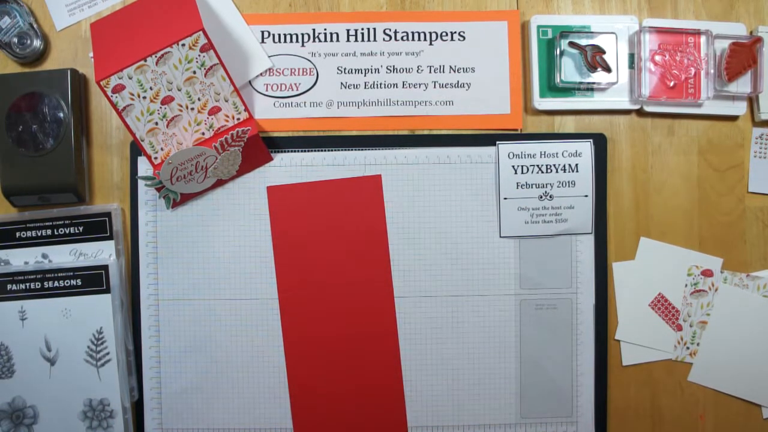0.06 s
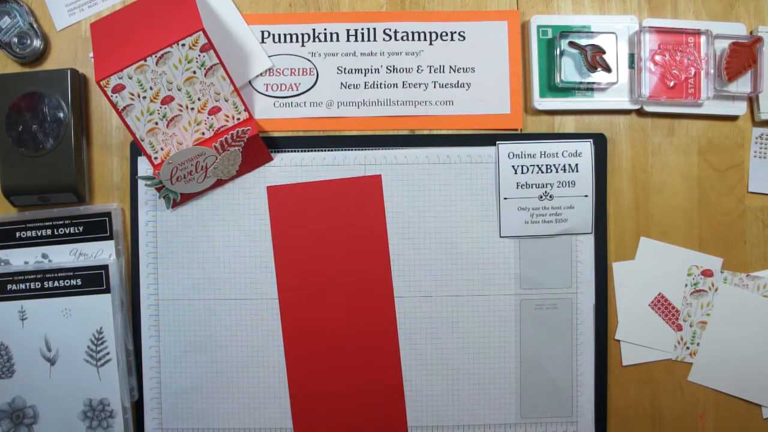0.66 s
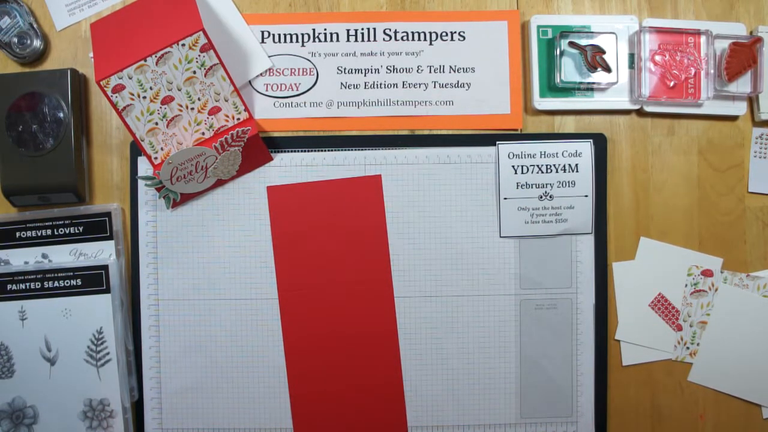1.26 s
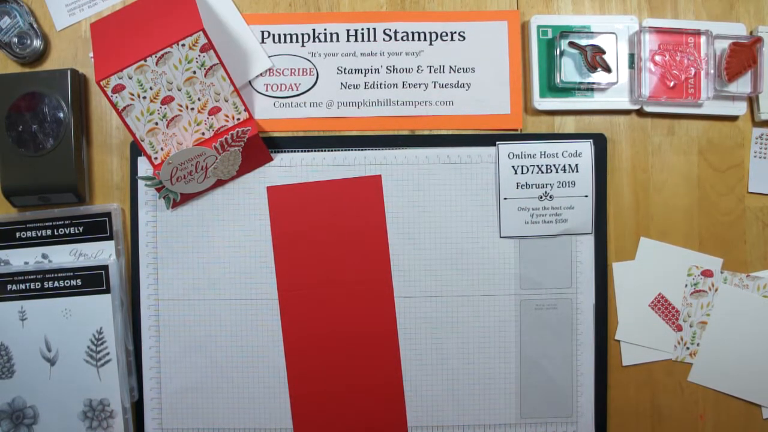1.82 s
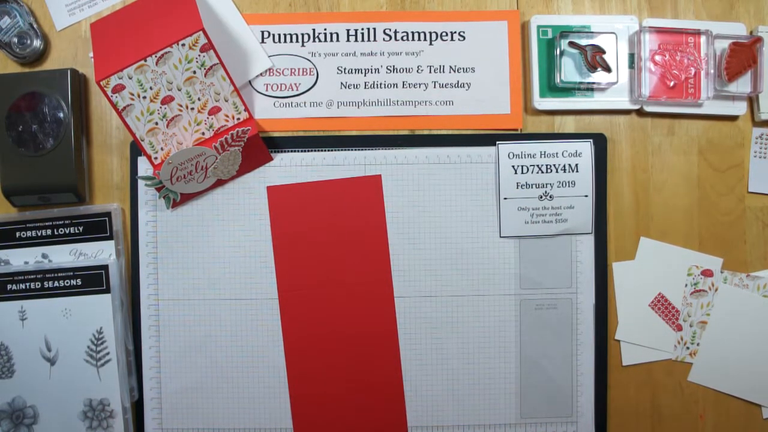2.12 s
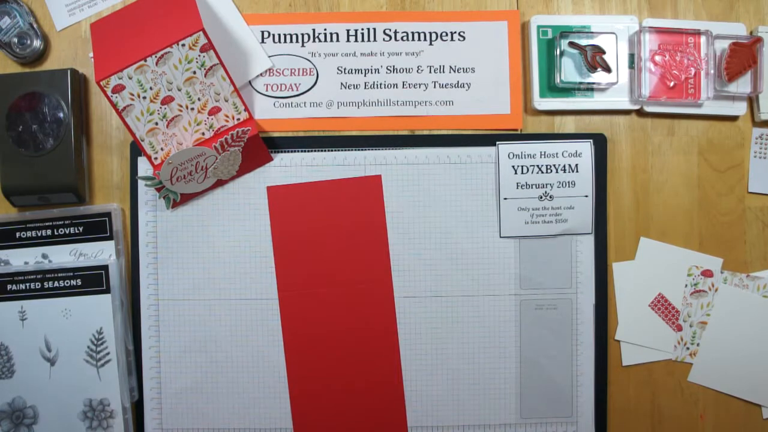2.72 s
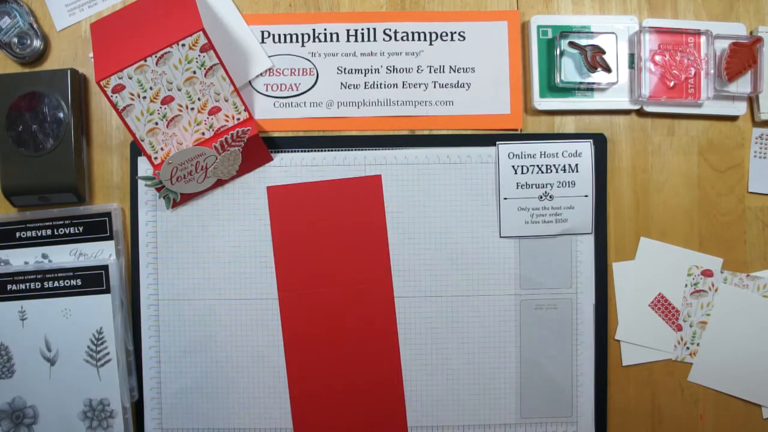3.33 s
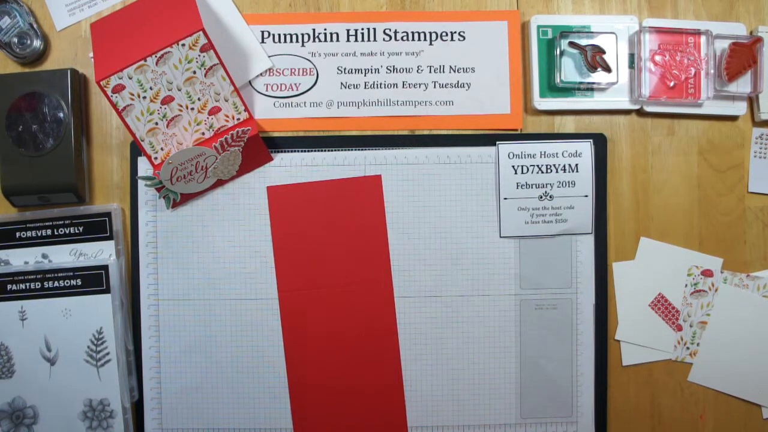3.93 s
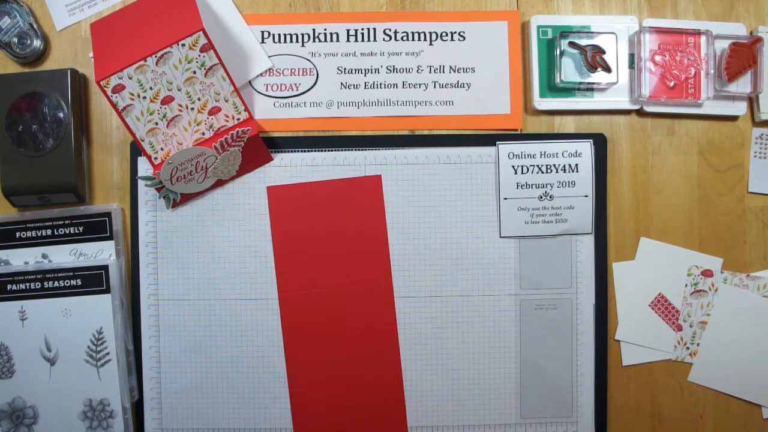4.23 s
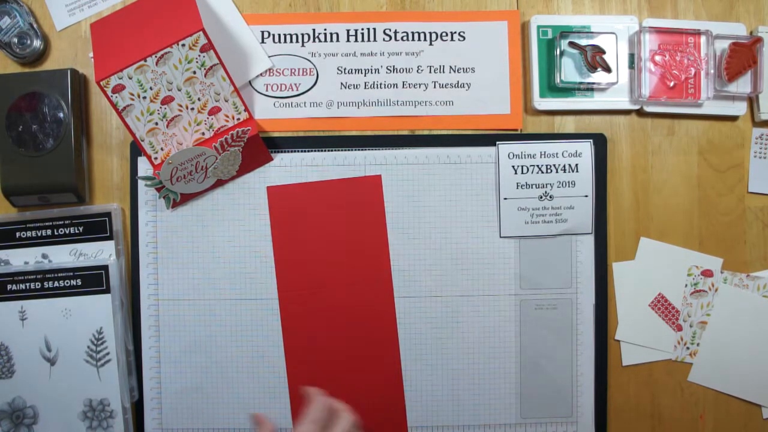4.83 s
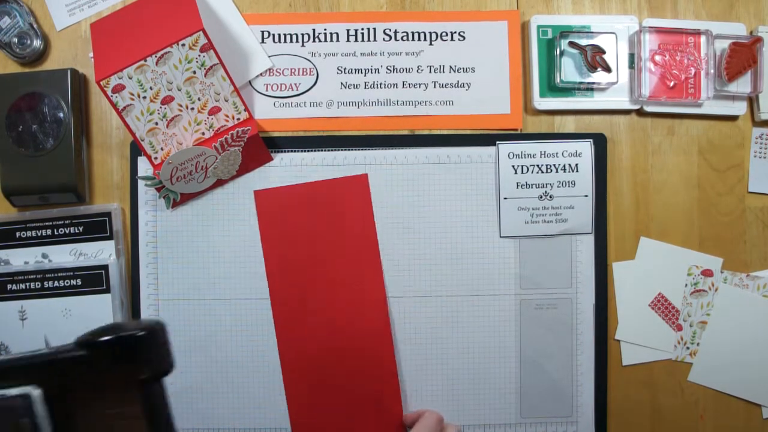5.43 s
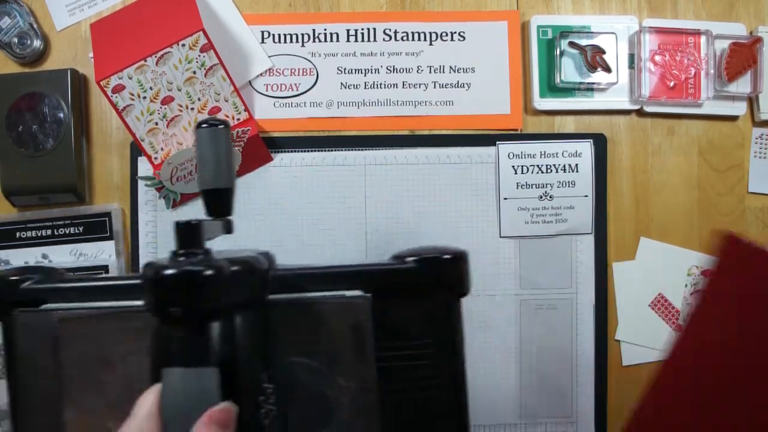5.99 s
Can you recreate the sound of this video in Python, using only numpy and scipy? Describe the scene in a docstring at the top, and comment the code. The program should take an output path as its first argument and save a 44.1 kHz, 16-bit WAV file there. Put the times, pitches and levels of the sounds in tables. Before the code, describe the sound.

Scrapes, loud knocks and plastic clatter as a heavy hand-cranked machine is shifted on a table, followed by lighter taps and rubs.

```python
"""Scrapes and bumps at the left: a heavy hand-cranked die-cutting machine is dragged and set down on a
wooden table in a small room. Its plastic plates clack and slide on the bed; then it is lifted over the
table, nearer the centre, while a card strip is pulled away. Blows ring damped modes and crack at the
edges; friction gives grainy noise, stick-slip gives brief tones. Two close microphones hear it from
above, over a steady hush."""
import sys
import numpy as np
from scipy import signal
from scipy.fft import rfft, irfft, next_fast_len
from scipy.io import wavfile
from scipy.ndimage import map_coordinates

SR = 44100
rng = np.random.default_rng(int(sys.argv[2]) if len(sys.argv) > 2 else 0)


def file_out(sig):
    """Save sig as 16-bit WAV at sys.argv[1]."""
    # one column per channel
    cols = np.atleast_2d(sig).T
    # limit, then scale
    lim = np.clip(cols, -1, 1)
    pcm = np.round(lim * 32767).astype(np.int16)
    wavfile.write(sys.argv[1], SR, pcm)


N = 267157


def machine_bumps():
    """The base hits the table; machine and table ring together."""
    # t/s, level/dB, body f/Hz, contact hardness/dB, hand damping/(dB/s)
    hits = [(0.333, -16, 420, -40, 32), (0.707, -23, 470, -42, 50), (0.926, -28, 384, -14.5, 10),
            (1.405, -5, 503, -23.5, 85), (1.853, -9, 517, -29, 58), (1.862, -5, 490, -19, 25),
            (1.882, -14, 494, -10.5, 13), (3.256, -34, 490, -33, 40), (3.319, -29, 546, -22, 40),
            (3.451, -18.5, 487, -21.5, 52), (3.483, -26, 404, -14, 94), (4.744, -38, 296, -13.5, 35),
            (4.855, -36.5, 353, -30, 38), (5.584, -36, 300, -26, 50), (5.939, -31, 648, -13.5, 38)]
    # machine on table: f/Hz, level/dB, t60/s
    modes = [(110.2, -5.5, 0.53), (228.4, -2.5, 0.146), (279.5, -2, 0.46), (439, 0, 0.24), (547, -2, 0.17),
             (615, 0, 0.33), (720, -0.5, 0.12), (903, -2, 0.29), (991, 4.5, 0.18), (1177, 5.5, 0.16),
             (1323, 6, 0.27), (1463, 3.5, 0.25), (2040, 2, 0.21), (2520, -17, 0.22)]
    return blows(hits, modes, push_db=15.5, chatter_t60_s=0.12, chatter_db=7.5, room_db=13, ring_db=-0.5,
                 body_db=-17, crack_db=-1.5, tick_db=-10.5, tick_growth=1.15, band_ratio=1.51)


def plate_clacks():
    """Plastic plates clack and rattle on the bed."""
    # t/s, level/dB, body f/Hz, contact hardness/dB, hand damping/(dB/s)
    hits = [(0.349, -19.5, 940, -36, 39), (0.924, -23.5, 800, -7.5, 8), (1.652, -33.5, 590, 0, 30),
            (1.915, -20, 920, -22, 22), (2.563, -5.5, 860, -14.5, 9), (2.679, -29, 670, -15, 10),
            (2.994, -32.5, 690, -6, 3), (3.035, -35, 720, -22, 30), (3.353, -18, 735, -24, 42),
            (3.408, -20, 1060, -28, 47), (3.563, -35.5, 980, -9, 30), (4.741, -36, 1290, -13, 30),
            (4.906, -38.5, 810, -28, 15), (5.032, -41, 830, -6.5, 25), (5.358, -38.5, 850, -11, 10),
            (5.778, -36, 1090, -7, 27)]
    # plates: f/Hz, level/dB, t60/s
    modes = [(184.8, 2, 0.33), (503, 6.5, 0.42), (519, 1, 0.56), (600, -9, 0.31), (729, 3, 0.53),
             (806, 1.5, 0.29), (978, 10, 0.2), (1030, 10.5, 0.22), (1140, 1.5, 0.25), (1218, 9, 0.18),
             (1380, -10, .24), (2000, -28, .27), (2264, 7, 0.32), (2364, 2, 0.3), (2820, 1, 0.43),
             (3080, 8, 0.17), (3198, -16, 0.11), (3630, -15, 0.22)]
    return blows(hits, modes, push_db=-2.5, chatter_t60_s=0.076, chatter_db=3.5, room_db=8, ring_db=-1.5,
                 body_db=-12.5, crack_db=-4.5, tick_db=-5, tick_growth=1.93, band_ratio=1.62)


def blows(hits, modes, push_db, chatter_t60_s, chatter_db, room_db, ring_db,
          body_db, crack_db, tick_db, tick_growth, band_ratio):
    """Each blow knocks the body and rings its modes; harder contact cracks and ticks more."""
    out = np.zeros((2, N))
    for start_s, level_db, body_hz, hardness_db, damping_db_per_s in hits:
        knock = contact(start_s, push_db, chatter_t60_s, chatter_db, room_db)
        t = np.arange(knock.shape[1]) / SR
        # place of contact sets body pitch and favoured modes
        lo_hz, hi_hz = body_hz / band_ratio, body_hz * band_ratio
        body = onset_unit(band(knock, lo_hz, hi_hz, order=3))
        ring = band(ringing(modes, t), lo_hz, hi_hz, order=1)
        ring = onset_unit(placed(ring, start_s))
        sound = amp(body_db) * (body + amp(ring_db) * ring)
        sound += amp(crack_db + hardness_db) * edge_crack(start_s, lo_hz=1670, hi_hz=3740)
        sound += amp(tick_db + tick_growth * hardness_db) * edge_crack(start_s, lo_hz=4030, hi_hz=11100)
        add(out, sound * amp(level_db - damping_db_per_s * t), start_s)
    return out


def ringing(modes, t):
    """Damped sines; the higher ones differ more in phase between microphones."""
    ring = np.zeros((2, len(t)))
    for hz, level_db, t60_s in modes:
        envelope = amp(level_db + rng.normal(0, 1)) * 1000 ** (-t / t60_s)
        phase_rad = rng.normal(0, min(hz / 1200, 1), (2, 1))
        ring += envelope * np.sin(2 * np.pi * hz * t + phase_rad)
    return ring * attack(len(t), rise_s=0.002)


def edge_crack(start_s, lo_hz, hi_hz):
    """A hard edge cracks; most of its treble arrives off the walls."""
    edge = contact(start_s, push_db=2, chatter_t60_s=0.34, chatter_db=2.5, room_db=9)
    edge *= attack(edge.shape[1], rise_s=0.0025)
    return onset_unit(band(edge, lo_hz, hi_hz, order=2))


def contact(start_s, push_db, chatter_t60_s, chatter_db, room_db):
    """Broadband excitation: sharp push, chatter of loose parts, room tail."""
    tail = room_tail()
    t = np.arange(tail.shape[1]) / SR
    chatter = rng.standard_normal(len(t)) * 1000 ** (-t / chatter_t60_s)
    push = signal.unit_impulse(len(t), SR // 1000)
    direct = amp(push_db) * push + amp(chatter_db) * chatter / np.linalg.norm(chatter)
    return placed(direct, start_s) + amp(room_db) * tail


def table_thuds():
    """Weight settles on the machine's feet; the table top thuds."""
    # t/s, level/dB
    thuds = [(1.343, -55.5), (1.875, -40), (2.564, -43), (3.28, -55), (3.481, -57), (4.744, -51.5),
             (5.94, -52)]
    out = np.zeros((2, N))
    for start_s, level_db in thuds:
        push = contact(start_s, push_db=-5.5, chatter_t60_s=0.095, chatter_db=8.5, room_db=6)
        add(out, amp(level_db) * onset_unit(band(push, lo_hz=98, hi_hz=221, order=2)), start_s)
    return out


def edge_flicks():
    """Thin edges of card and plate snap free: all treble, no body."""
    # t/s, level/dB
    flicks = [(0.576, -48.5), (1.652, -43.5), (5.128, -55.5), (5.147, -52), (5.922, -33)]
    out = np.zeros((2, N))
    for start_s, level_db in flicks:
        snap = contact(start_s, push_db=-2, chatter_t60_s=0.082, chatter_db=12.5, room_db=12.5)
        snap *= attack(snap.shape[1], rise_s=0.002)
        add(out, amp(level_db) * onset_unit(band(snap, lo_hz=3300, hi_hz=10200, order=1)), start_s)
    return out


def slides(rumble_db=-2.5, rasp_db=-1.5, hiss_db=-4.5):
    """Base, plates or card scrape along; a light, bright slide hisses more and rumbles less."""
    # t/s, length/s, level/dB, swell/dB, brightness/dB
    pushes = [(0.0, 0.05, -41.5, -16.5, 0), (0.098, 0.16, -46, 9.5, -2), (0.244, 0.064, -35, 10, 2.5),
              (0.45, 0.453, -48, -0.5, 0.5), (0.978, 0.14, -54.5, -24, -3), (1.147, 0.14, -50, -4, 0),
              (1.264, 0.21, -40, 3.5, 5), (1.435, 0.25, -42.5, 0, 1.5), (1.654, 0.22, -39, -9, 1),
              (2.029, 0.14, -54.5, 0.5, -0.5), (3.191, 0.184, -49, 16, -5.5),
              (3.358, 0.14, -38.5, -0.5, 0.5), (5.357, 0.093, -45, 3.5, 0), (5.523, 0.15, -48, -7, 4),
              (5.67, 0.066, -40.5, 8, 9), (5.747, 0.2, -54.5, 1, -2.5), (5.98, 0.072, -56, -12, -2.5)]
    # spectra excited by sliding: f/Hz, density/dB
    rumble = [(40, -22), (110, -15.5), (220, -6.5), (420, -2), (750, -2), (1200, -4), (1800, -5.5),
              (4000, -34)]
    rasp = [(700, -33), (1300, -1.5), (1700, -2.5), (3000, 2), (4200, -3.5), (7000, -18)]
    hiss = [(2500, -48), (4500, -4.5), (7000, -5), (11000, -10.5)]
    out = np.zeros((2, N))
    for start_s, length_s, level_db, swell_db, bright_db in pushes:
        envelope = amp(level_db) * stroke(length_s, swell_db)
        layers = ((rumble, rumble_db - bright_db), (rasp, rasp_db), (hiss, hiss_db + bright_db))
        scrape = sum(amp(db) * friction(spectrum, len(envelope)) for spectrum, db in layers)
        add(out, in_room(envelope * scrape, start_s, room_db=5.5), start_s)
    return out


def friction(spectrum, n, grain_db=3.5, judder_db=2):
    """Tiny uneven catches, bunched by the stroke's judder; rms 1."""
    catches = rng.standard_normal(n)
    catches *= amp(grain_db * wobble(n, rate_hz=700) + judder_db * wobble(n, rate_hz=43.8))
    return unit(filtered(catches, lambda hz: amp(along(spectrum, hz))))


def edge_rubs(grain_db=3):
    """An edge catches and scrapes in one resonance."""
    # t/s, length/s, centre f/Hz, half width/octaves, level/dB
    rubs = [(0.261, 0.09, 1180, 0.47, -39), (0.574, 0.033, 1510, 0.6, -44.5),
            (0.645, 0.015, 1820, 0.4, -37.5), (0.828, 0.035, 1580, 0.58, -43),
            (1.19, 0.058, 190, 0.48, -52), (1.727, 0.029, 486, 0.4, -35.5),
            (2.779, 0.028, 218, 0.39, -48.5), (5.135, 0.022, 4370, 0.46, -44.5),
            (5.185, 0.04, 4930, 0.26, -43), (5.534, 0.016, 3250, 0.34, -37.5),
            (5.616, 0.011, 2380, 0.61, -42), (5.676, 0.043, 1590, 0.52, -43),
            (5.815, 0.048, 408, 0.45, -54)]
    out = np.zeros((2, N))
    for start_s, length_s, centre_hz, half_width_oct, level_db in rubs:
        envelope = amp(level_db) * stroke(length_s)
        n = len(envelope)
        catches = rng.standard_normal(n) * amp(grain_db * wobble(n, rate_hz=598))
        scrape = filtered(catches, lambda hz: 1 / (1 + (np.log2((hz + 1) / centre_hz) / half_width_oct) ** 2))
        add(out, in_room(envelope * unit(scrape), start_s, room_db=4), start_s)
    return out


def squeaks():
    """Surfaces stick and slip at one nearly pure pitch."""
    # t/s, length/s, f/Hz, level/dB
    slips = [(0.263, 0.015, 1680, -33), (0.307, 0.011, 1480, -42), (0.563, 0.013, 755, -41),
             (1.747, 0.075, 770, -40), (3.573, 0.014, 763, -46)]
    out = np.zeros((2, N))
    for start_s, length_s, hz, level_db in slips:
        envelope = amp(level_db) * stroke(length_s)
        add(out, slip_tone(envelope, hz, start_s, waver=0.015, harmonic_step_db=-16), start_s)
    return out


def plate_zip(start_s=3.757, length_s=0.14, level_db=-50.5, start_hz=971, rise_hz_per_s=7500):
    """A plate ticks over a ridged surface at a rising rate."""
    out = np.zeros((2, N))
    envelope = amp(level_db) * stroke(length_s, swell_db=-9)
    t = np.arange(len(envelope)) / SR
    ridge_hz = start_hz + rise_hz_per_s * np.minimum(t, length_s)
    add(out, slip_tone(envelope, ridge_hz, start_s, waver=0.1, harmonic_step_db=-2.5), start_s)
    return out


def slip_tone(envelope, hz, start_s, waver, harmonic_step_db):
    """Unevenly spaced slips make a rough five-harmonic tone."""
    phase = 2 * np.pi * np.cumsum(hz * (1 + waver * wobble(len(envelope), rate_hz=700))) / SR
    tone = sum(amp(harmonic_step_db * k) * np.sin((k + 1) * phase) for k in range(5))
    return in_room(envelope * unit(tone), start_s, room_db=0.5)


def stroke(length_s, swell_db=0, grip_share=0.041, release_s=0.0097, tail_s=0.35):
    """Rubbing envelope: grip, even swell or fade, release."""
    t = np.arange(round((length_s + tail_s) * SR)) / SR
    swell = amp(swell_db * (np.minimum(t / length_s, 1) - 0.5))
    release = np.exp(-np.maximum(t - length_s, 0) / release_s)
    return attack(len(t), grip_share * length_s) * swell * release


def placed(x, start_s):
    """Sound reaches the nearer microphone first."""
    # t/s, left microphone lead/ms
    bearing = [(0, 0.18), (3.6, 0.16), (5, -0.035), (6, -0.0098)]
    lead_s = np.interp(start_s, *np.transpose(bearing)) / 1000
    return filtered(x, lambda hz: np.exp(1j * np.pi * lead_s * np.outer([1, -1], hz)))


def in_room(x, start_s, room_db):
    """Direct sound plus reverberation, at unchanged power."""
    wet = signal.fftconvolve(x[None], room_tail(), axes=1)[:, :len(x)]
    return (placed(x, start_s) + amp(room_db) * wet) / np.sqrt(1 + amp(room_db) ** 2)


def room_tail():
    """Fresh stereo reverberation of energy 1; treble dies first."""
    # f/Hz, t60/s
    decay = [(100, 0.33), (400, 0.43), (1000, 0.38), (3000, 0.31), (10000, 0.26)]
    # f/Hz, side minus mid/dB
    width = [(100, -12), (280, -18.5), (550, -1.5), (1000, -7.5), (1900, 1), (3300, 4), (5500, 6),
             (9000, -0.5)]
    hz, t, spectra = signal.stft(diffuse(SR * 3 // 5, width), SR, nperseg=256)
    spectra *= amp(-60 * t / along(decay, hz)[:, None])
    _, tail = signal.istft(spectra, SR, nperseg=256)
    tail *= attack(tail.shape[1], rise_s=0.00064)
    return tail / np.linalg.norm(tail[0])


def room_hush(level_db=-51):
    """Steady noise of room and microphones."""
    # f/Hz, density/dB
    spectrum = [(15, -62), (25, -42), (47, -14.5), (118, -4.5), (223, -1.5), (254, 2), (327, 0), (588, 0),
                (721, 0), (1800, -6), (11000, -21), (14300, -86), (22000, -120)]
    # f/Hz, side minus mid/dB
    width = [(60, -2.5), (170, 5), (500, 4.5), (1420, 4.5), (4080, 1.5), (11700, -1)]
    return amp(level_db) * unit(filtered(diffuse(N, width), lambda hz: amp(along(spectrum, hz))))


def diffuse(n, width):
    """White stereo noise from all sides, split into mid and side by width."""
    def mid_side_gains(hz):
        gains = amp(np.outer([0, 1], along(width, hz)))
        return gains / np.linalg.norm(gains, axis=0)
    mid, side = filtered(rng.standard_normal((2, n)), mid_side_gains)
    return np.array([mid + side, mid - side])


def amp(db):
    return 10 ** (np.asarray(db) / 20)


def unit(x):
    return x / np.sqrt(np.mean(x ** 2) + 1e-20)


def onset_unit(x):
    """Rms 1 over the first 36 ms."""
    return x / np.sqrt(np.mean(x[:, :SR // 28] ** 2) + 1e-20)


def attack(n, rise_s):
    return 1 - np.exp(-np.arange(n) / SR / rise_s)


def along(points, hz):
    """Interpolates (f/Hz, value) points over log frequency."""
    knots_hz, values = np.transpose(points)
    return np.interp(np.log(hz + 1), np.log(knots_hz + 1), values)


def wobble(n, rate_hz):
    """Smooth random curve with knots at rate_hz."""
    knots = rng.standard_normal(int(n * rate_hz / SR) + 4)
    return map_coordinates(knots, [np.arange(n) * rate_hz / SR])


def filtered(x, response):
    """Applies a complex frequency response."""
    n = x.shape[-1]
    n_fft = next_fast_len(n + 8192)
    return irfft(rfft(x, n_fft) * response(np.fft.rfftfreq(n_fft, 1 / SR)), n_fft)[..., :n]


def band(x, lo_hz, hi_hz, order):
    return signal.sosfilt(signal.butter(order, [lo_hz, hi_hz], "band", fs=SR, output="sos"), x)


def add(out, x, start_s):
    part = out[:, round(start_s * SR):][:, :x.shape[1]]
    part += x[:, :part.shape[1]]


def scene():
    """Machine, plates and card slightly louder at the left; hush louder at the right."""
    knocks = machine_bumps() + plate_clacks() + table_thuds() + edge_flicks()
    rubbing = slides() + edge_rubs() + squeaks() + plate_zip()
    return (knocks + rubbing) * amp([[0.5], [-0.5]]) + room_hush() * amp([[-1.2], [1.2]])


def record(dry):
    """Steep low-pass at the band limit."""
    top_hz = 10980
    return filtered(dry, lambda hz: 1 / np.sqrt(1 + (hz / top_hz) ** 200))


dry = scene()
out = record(dry)
file_out(out)
```